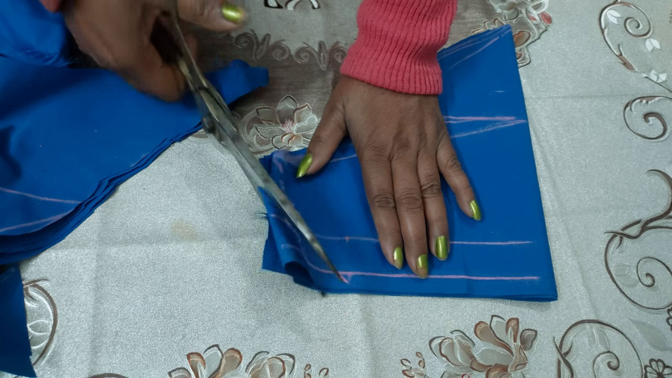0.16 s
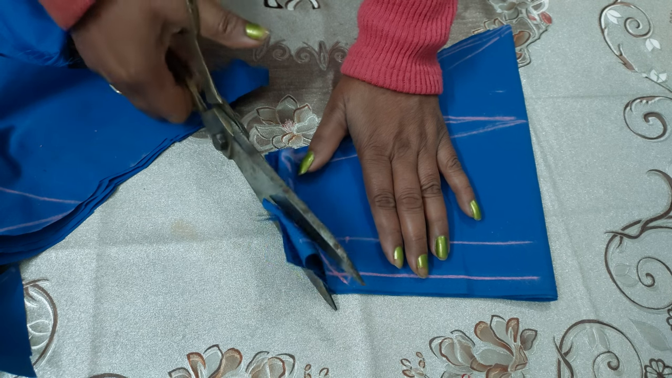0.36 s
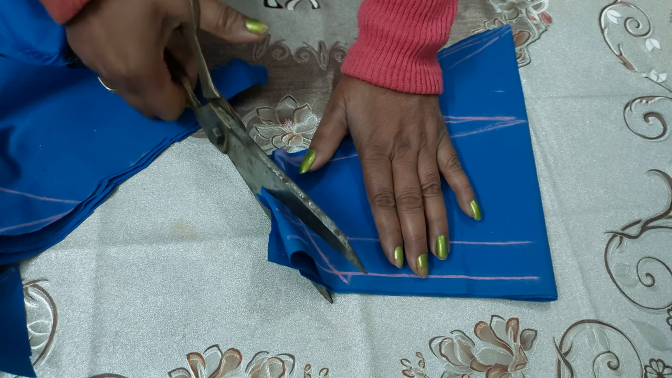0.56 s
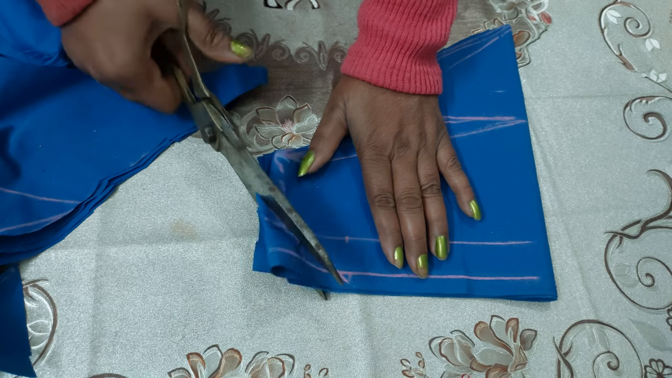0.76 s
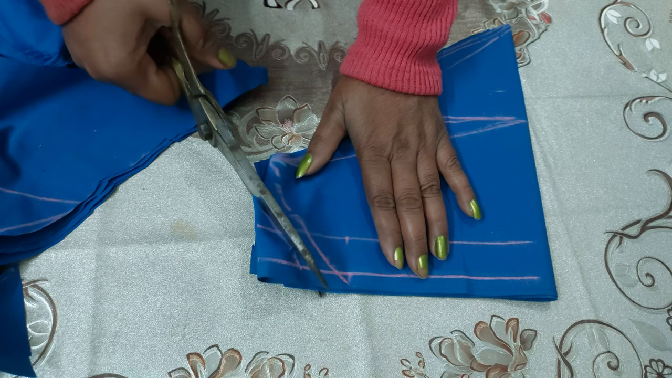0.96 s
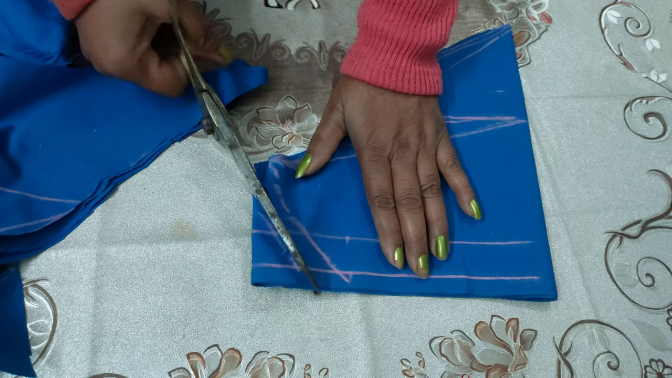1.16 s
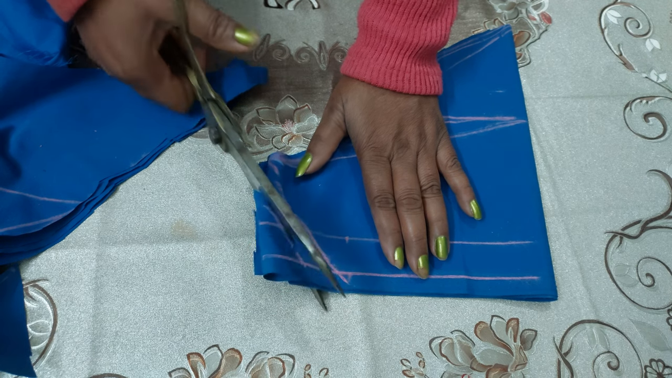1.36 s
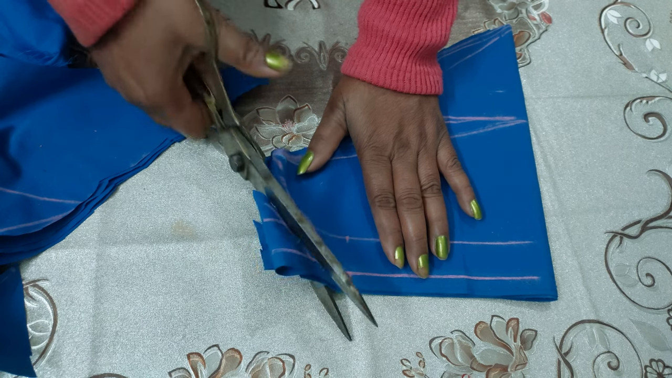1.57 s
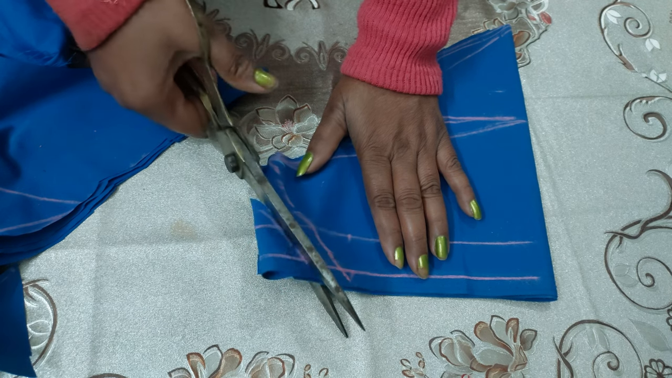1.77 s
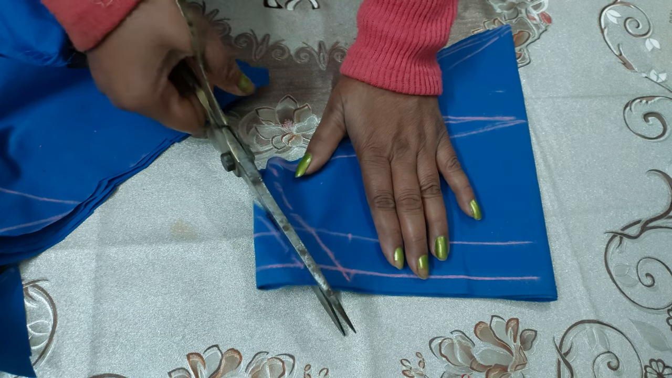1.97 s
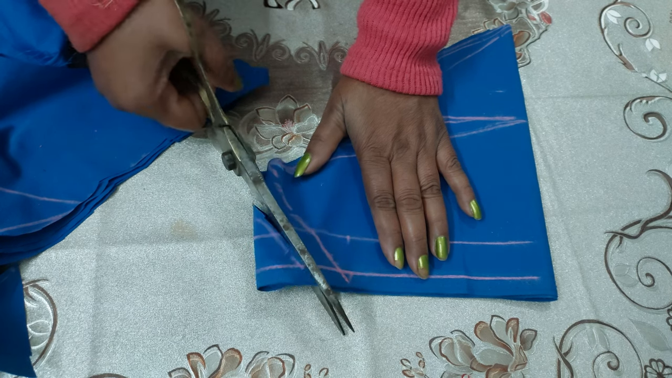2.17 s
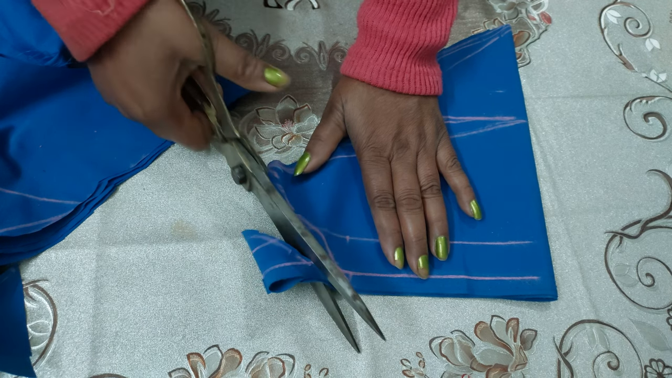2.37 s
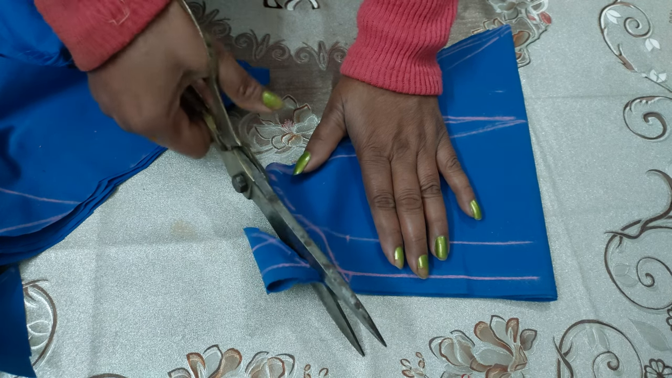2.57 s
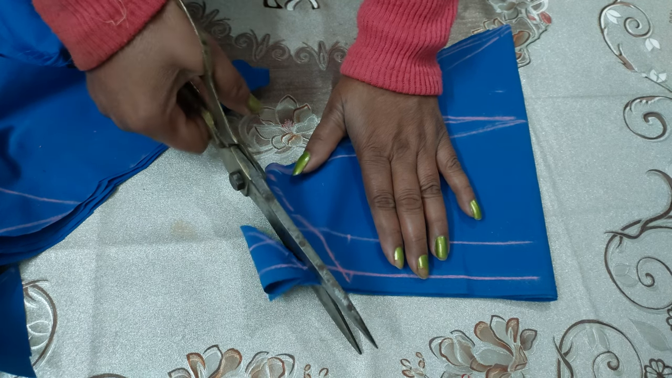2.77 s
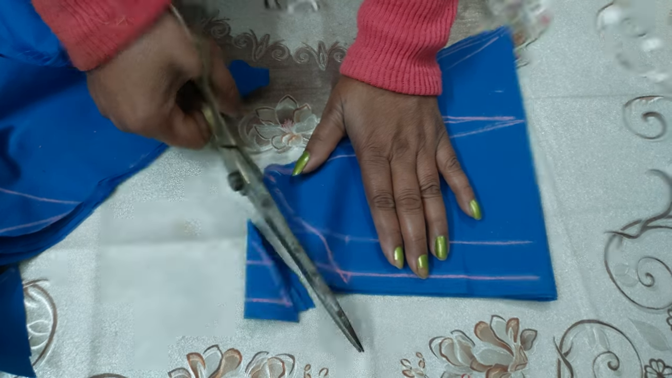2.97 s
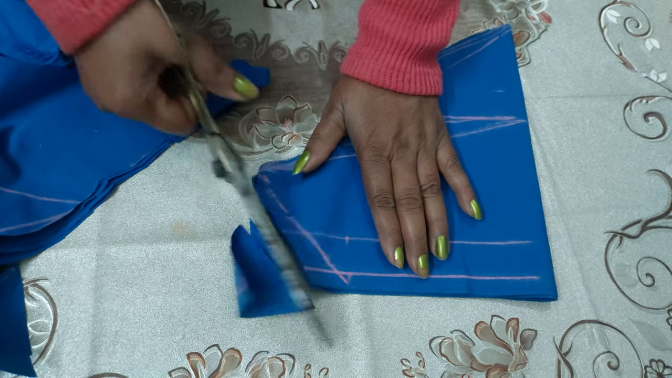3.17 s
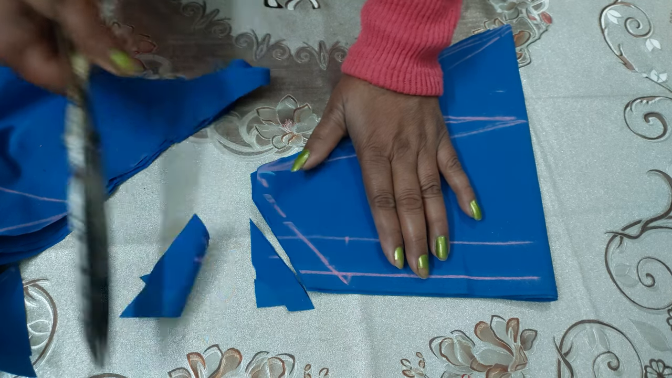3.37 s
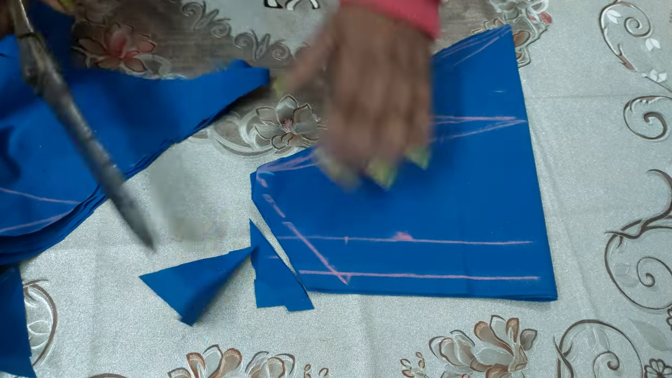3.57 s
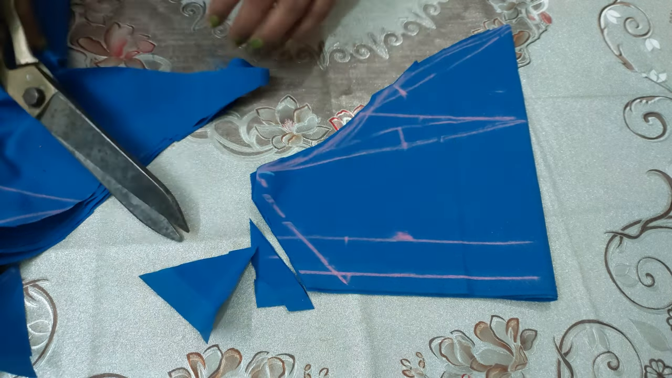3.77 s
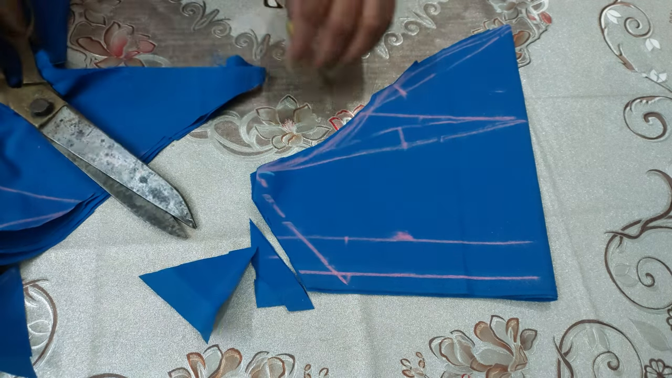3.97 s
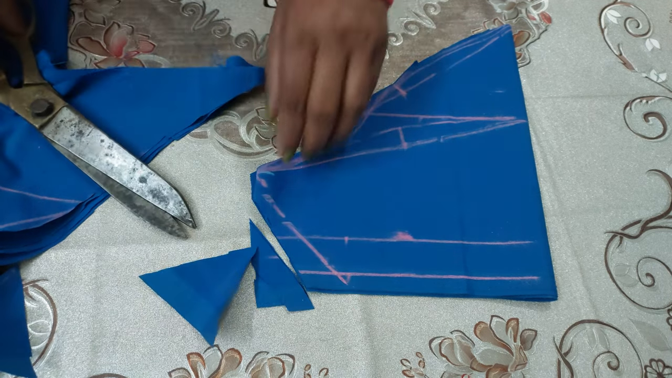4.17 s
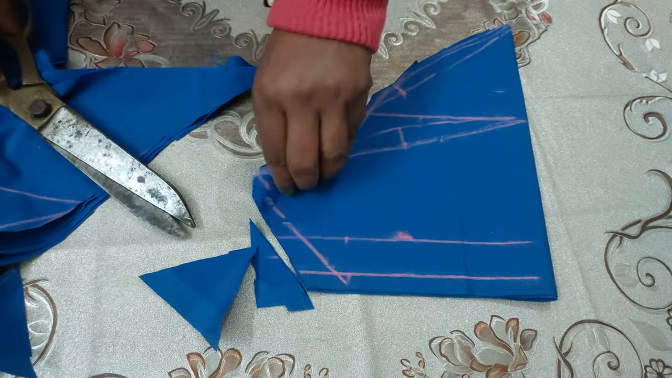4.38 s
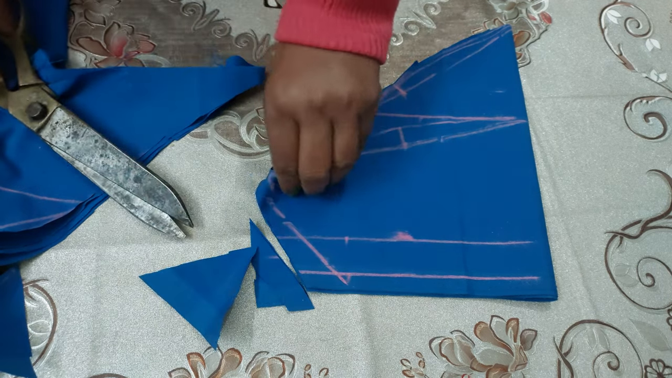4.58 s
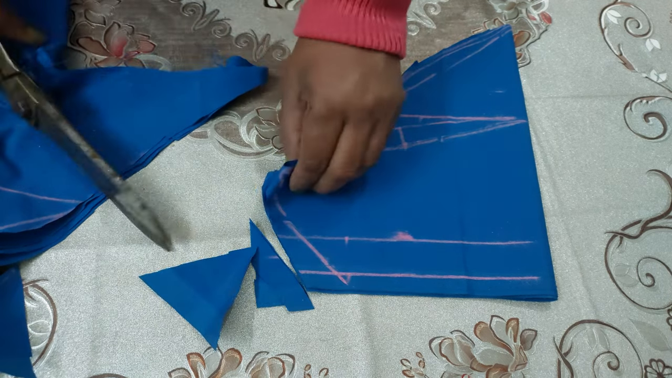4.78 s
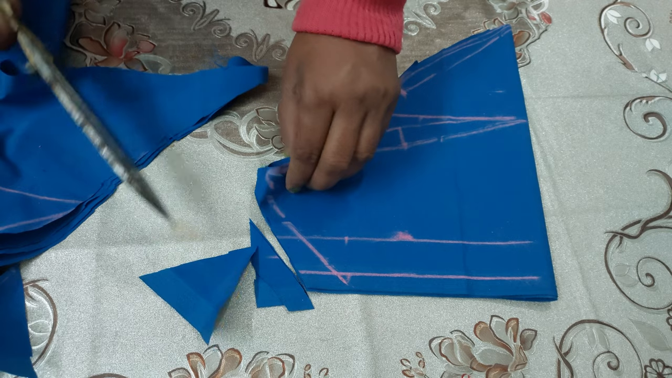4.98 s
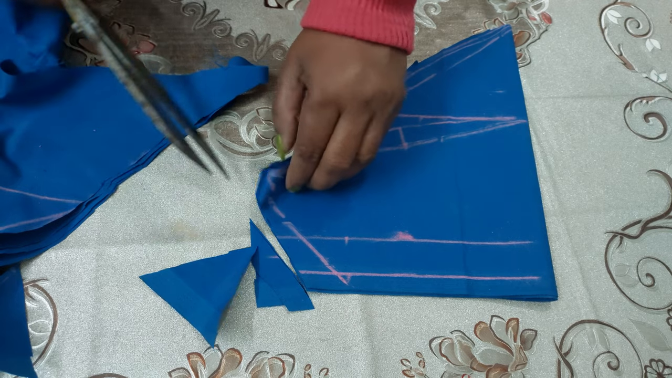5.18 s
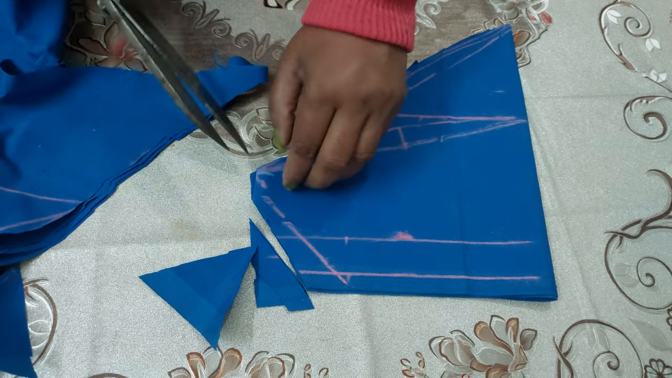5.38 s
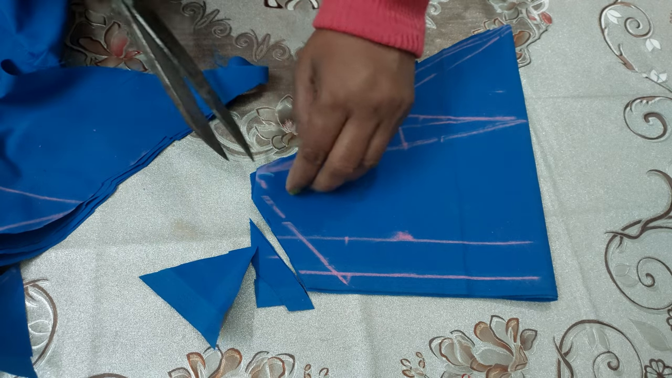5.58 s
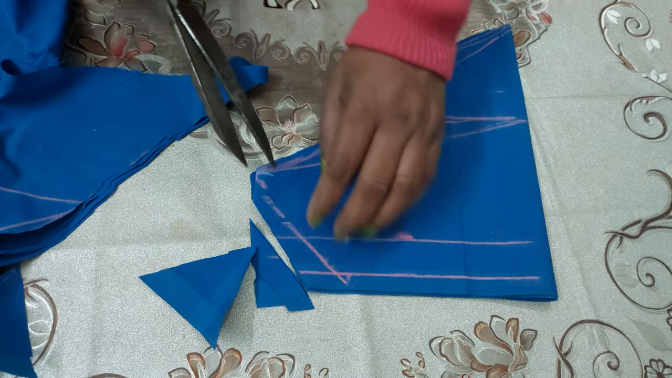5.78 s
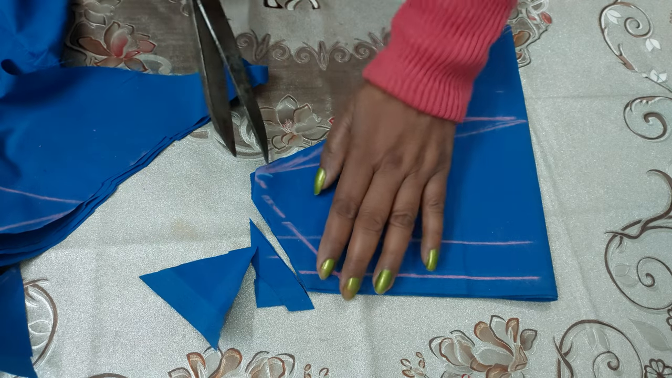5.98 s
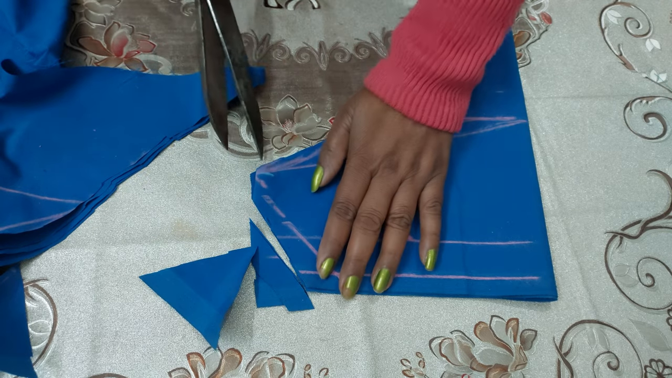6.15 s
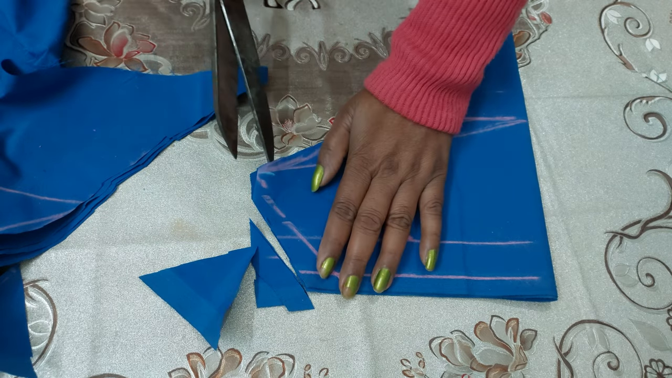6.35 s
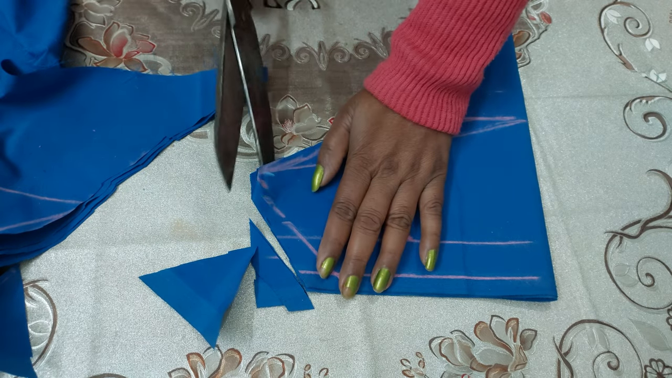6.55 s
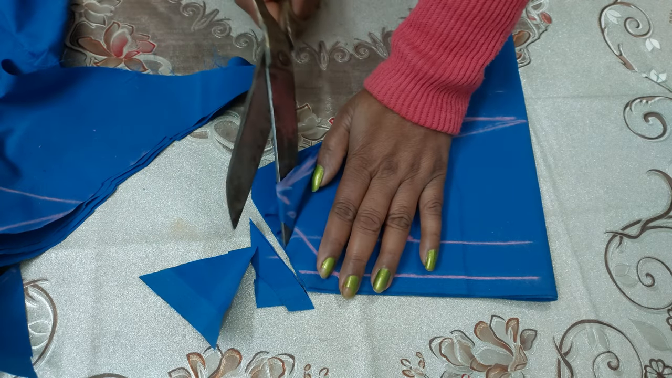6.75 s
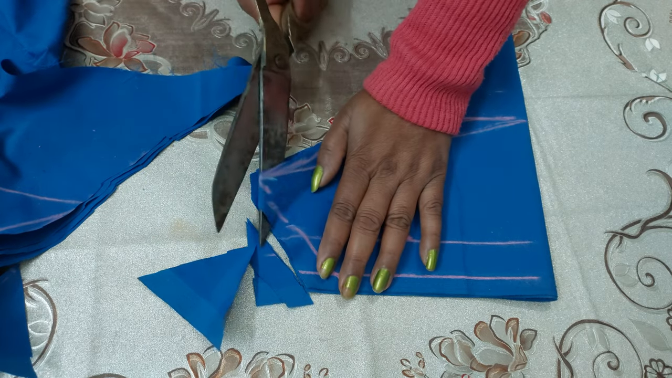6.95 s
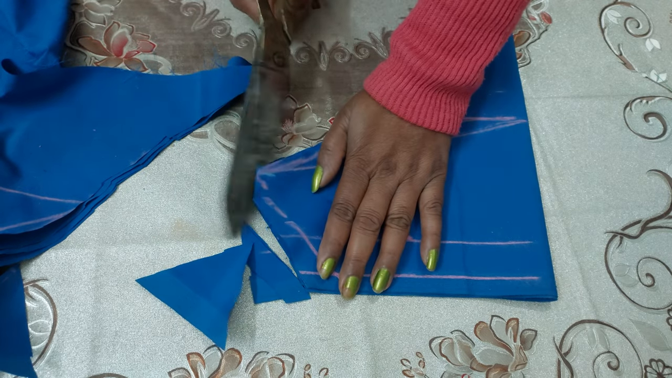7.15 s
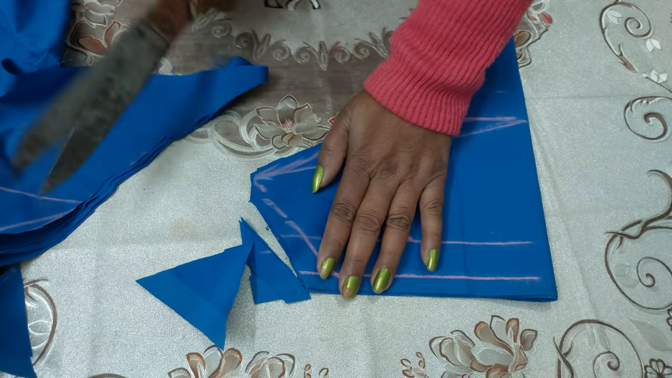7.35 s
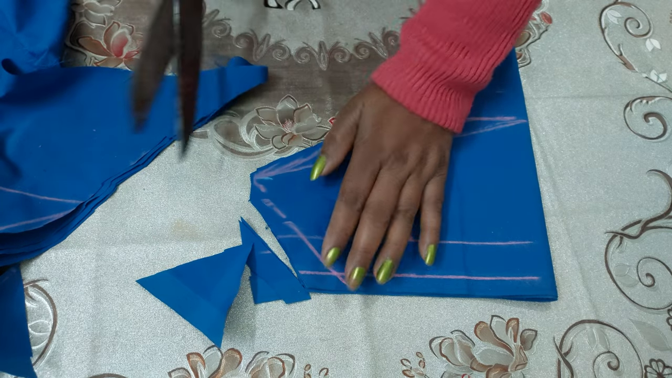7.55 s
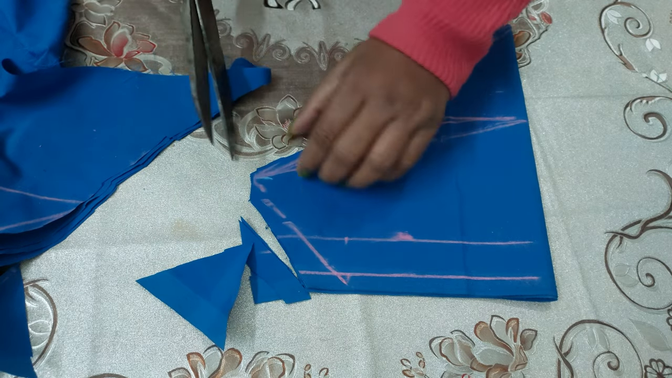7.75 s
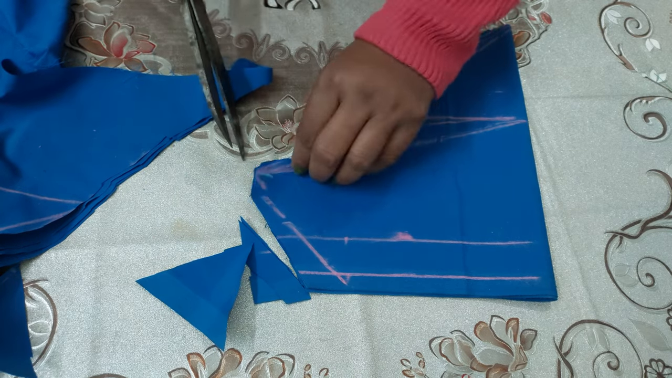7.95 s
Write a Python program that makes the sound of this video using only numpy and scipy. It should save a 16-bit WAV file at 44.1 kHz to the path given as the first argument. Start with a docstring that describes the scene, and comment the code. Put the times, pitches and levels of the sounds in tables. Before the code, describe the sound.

Close by in a small room, large shears crunch through fabric in uneven bursts, the cuts resonating in the wooden tabletop. The last cut finishes with a sharp metallic snap and a thump. Then come scattered knocks on the table, soft rustles of cloth and thin steel scrapes and squeaks as the empty blades move, all over a low, steady rush of room air.

```python
"""Tailor's shears cutting cloth

Heavy shears cut folded cloth on a wooden table in a small, hard room. Threads snap in runs;
the lower blade carries the crunch into the table top. The last cut ends as the blades clap shut.
Shears and hands bump the table, hands smooth the cloth, and a forearm drags with a rumble.
The bare blades scrape, grind and squeak at the pivot."""
import sys
import numpy as np
from scipy import signal
from scipy.fft import rfft, irfft, next_fast_len
from scipy.io import wavfile
from scipy.ndimage import map_coordinates

SR = 44100
rng = np.random.default_rng(int(sys.argv[2]) if len(sys.argv) > 2 else 0)


def materialize(psi):
    """Save the field psi as 16-bit PCM at rate SR to the path in sys.argv[1].

    A 1-D psi becomes a single channel; in a 2-D psi each row is a channel.
    """
    bounded = np.clip(np.atleast_2d(psi).T, -1, 1)
    quanta = np.round(bounded * 32767).astype(np.int16)
    wavfile.write(sys.argv[1], SR, quanta)


N = 353682

# Sweeps over the cloth. Each row: start and length in seconds, hiss in dB, sheen in dB re hiss.
CLOTH_STROKES = [(0.0,0.33,-64.5,-1.5), (0.798,0.34,-60.5,-9.5), (1.308,0.33,-61.5,-9),
                 (1.65,0.32,-67.5,-11), (2.234,0.55,-72,-7.5), (2.9,0.71,-73,-9), (3.546,0.3,-78,2),
                 (3.79,0.22,-68.5,-6), (4.205,0.34,-70,-14.5), (4.684,0.28,-68.5,-5), (5.562,0.76,-70.5,-6),
                 (5.78,0.17,-67,-13.5), (6.464,0.72,-67.5,-12), (6.603,0.32,-73,6.5), (7.33,0.29,-70,-7),
                 (7.825,0.24,-68,-20)]
# Blade actions. Each row: start in seconds, length in seconds, level in dB.
BLADE_PUSHES = [(0.0,0.34,-44), (0.406,0.41,-52.5), (0.648,0.13,-41), (0.768,0.47,-37.5),
                (1.295,0.41,-44.5), (1.59,0.5,-40.5), (2.237,0.12,-44), (2.45,0.43,-43.5), (4.302,0.18,-43)]
EDGE_GRINDS = [(0.033, 0.013, -53), (0.101, 0.024, -61), (1.379, 0.02, -48.5), (1.98, .03, -46.5),
               (2.257, 0.11, -63), (3.353, .005, -56), (3.745, 0.0052, -44.5), (7.172, 0.039, -51)]
THREAD_RUNS = [(0.102,0.023,-36), (0.864,0.041,-33), (0.888,0.11,-34.5), (0.994,0.013,-24.5),
               (1.012,0.078,-27.5), (1.058,0.02,-25), (1.099,0.018,-24), (1.117,0.042,-38),
               (1.311,0.027,-42), (1.836,0.05,-31.5), (1.986,0.019,-27), (2.016,0.0083,-26),
               (2.027,0.023,-26.5), (2.059,0.075,-36.5), (2.704,0.012,-31), (2.759,0.018,-30.5),
               (2.772,0.04,-35), (2.811,0.029,-29.5), (2.957,0.013,-22.5), (2.966,0.012,-17.5)]
# Bumps on the table. Each row: start in seconds, strength in dB, hardness in dB of clack re thud.
TABLE_KNOCKS = [(0.017,-1.5,-4.5), (0.045,3,-13.5), (0.154,9,-10.5), (1.065,-1,2), (1.328,4.5,-23),
                (1.426,5,-12.5), (1.851,8,-14), (1.994,10.5,-18), (2.029,5,-8), (2.13,0,-3),
                (2.515,7.5,-21), (2.711,6.5,-25), (2.97,14.5,-11.5), (2.982,23.5,-16), (3.748,13.5,-0.5),
                (4.299,11.5,-19), (4.787,-0.5,-27), (6.364,-6.5,-19.5), (6.538,3.5,-25), (7.097,-5,-25),
                (7.905,-8,-7), (7.948,-7,-3.5)]
# Steel on steel. Each row: start and length in seconds, level in dB, place from pivot 0 to tip 1.
EDGE_SCRAPES = [(0.108,0.025,-49.5,0.4), (0.675,0.0048,-59,0.7), (0.691,0.055,-55,0.7), (1.023,0.059,-49,1),
                (1.105,0.007,-41.5,0.044), (1.372,0.042,-55,0.17), (1.657,0.0083,-57.5,0.64),
                (1.677,0.03,-55,0.31), (2.107,0.024,-57.5,.75), (2.278,0.036,-62.5,0.5),
                (2.537,0.015,-65,.2), (2.577,0.009,-54.5,0.31), (2.828,0.0095,-51.5,.45),
                (4.298,0.0017,-54,0.22), (4.84,0.028,-60,0.82), (5.01,0.0071,-61,0.7),
                (5.095,0.025,-50.5,.5), (5.68,0.2,-69.5,0.58), (7.142,0.077,-49,0.99),
                (7.205,0.0099,-41.5,0.044), (7.391,0.008,-40.5,0.22), (7.395,0.02,-49.5,1),
                (7.468,0.022,-48,.5), (7.516,0.006,-60.5,0.97)]
# Dry pivot. Each row: start in seconds, length in seconds, pitch in Hz, level in dB.
PIVOT_SQUEAKS = [(0.704, 0.02, 492, -43.5), (0.707, 0.017, 656, -39.5), (5.673, 0.062, 6600, -74),
                 (5.684, 0.042, 10700, -65), (5.718, 0.064, 7700, -68), (5.796, 0.031, 10560, -56),
                 (5.808, 0.075, 7000, -66)]

# Wood and steel resonances. Each row: centre in Hz, width in Hz, weight in dB.
TABLE_MODES = [(87, 9.7, 3.5), (104, 23.7, -1.5), (156, 19, -10.5), (207, 46, -12.5), (288, 44.4, -5),
               (350, 88, -16), (585, 97, -19.5), (664, 110, -16.5), (1050, 194, -22.5), (1163, 73, -21),
               (1747, 73, -24.5)]
BENDING_MODES = [(2210, 450, 6), (3460, 1100, -2.5)]
PIVOT_MODES = [(3520, 770, -36.5), (5440, 720, 0.5), (6340, 430, -9.5)]
MIDBLADE_MODES = [(3440, 770, -15), (7480, 580, -2), (7700, 210, -14.5)]
TIP_MODES = [(9500, 1000, -3.5), (11240, 1600, 0.5), (12850, 190, 8), (14600, 420, 2)]
# Ring of the whole shears. Each row: frequency in Hz, relative level in dB, T60 in seconds.
SHEARS_MODES = [(162.5, 17.5, 0.38), (920, -11, 0.033), (1235, -8, 0.37), (1285, -1, 0.16),
                (2350, -17, 0.22)]

# Source spectra. Each row: frequency in Hz, relative density in dB.
AIR_SPECTRUM = [(15, -60.5), (25, -26), (86, -13), (178, -12), (204, -9), (227, -13.5), (260, -6),
                (340, -14), (631, -13.5), (703, -18), (945, -19), (1110, -18), (1710, -26), (3530, -46.5),
                (15500, -56.5)]
HISS_SPECTRUM = [(700, -13.5), (1500, 2.5), (2500, -5.5), (5000, -4), (7500, -1.5), (8400, -15),
                 (15000, -16)]
SHEEN_SPECTRUM = [(4000, -30), (8500, -4), (12000, 0), (15500, -1)]
RASP_SPECTRUM = [(900, -19), (2000, 2), (2600, -3.5), (3450, 5), (4400, -7.5), (5500, -2.5), (7600, -11.5),
                 (8500, -13.5), (10500, -8.5), (12500, -8.5), (15500, -15.5)]
CRACK_SPECTRUM = [(300, -3), (700, 10), (1250, 16), (2000, 7), (2800, 10), (4200, 16), (6500, 2), (8000, 4),
                  (10000, -2), (12000, 3), (14000, 6), (15500, 8)]
CLANG_SPECTRUM = [(1500, -10), (2600, -6), (3600, -1), (4600, 1), (5400, 1), (6300, -10), (9000, -15),
                  (13000, -10), (15500, -11)]

# Diffuse field. Each row: frequency in Hz, left-right correlation.
COHERENCE = [(60, 1), (250, 0.86), (600, 0.69), (1500, 0.03), (8000, 0.065)]
# Room decay. Each row: frequency in Hz, T60 in seconds.
ROOM_T60_S = [(80, 0.61), (250, 0.48), (1000, 0.56), (5000, 0.32), (9000, 0.35), (15000, 0.21)]
# Wall reflections. Each row: frequency in Hz, relative level in dB.
WALL_DB = [(90, 0), (250, 1), (600, 4), (2000, 2), (8000, 0.5)]


def amp(db):
    """Decibels to gain."""
    return 10 ** (np.asarray(db) / 20)


def unit(x):
    """Scale to rms 1."""
    return x / np.sqrt(np.mean(x ** 2) + 1e-20)


def along(points, hz):
    """Interpolate (Hz, value) points on a log axis."""
    knots_hz, values = np.transpose(points)
    return np.interp(np.log(hz + 1), np.log(knots_hz + 1), values)


def add(track, start_s, sound):
    """Mix a sound into the track."""
    part = track[max(round(start_s * SR), 0):][:len(sound)]
    part += sound[:len(part)]


def wobble(rate_hz, n):
    """Smooth random curve, n samples."""
    knots = rng.standard_normal(int(n * rate_hz / SR) + 4)
    return map_coordinates(knots, [np.arange(n) * rate_hz / SR])


def grid_hz():
    """Frequency grid for filter design."""
    return np.fft.rfftfreq(16384, 1 / SR) + 1


def resonances(modes):
    """Gain of modes summed in power."""
    f = grid_hz()
    powers = (amp(db) ** 2 / (1 + ((f * f - hz * hz) / (f * width_hz)) ** 2)
              for hz, width_hz, db in modes)
    return np.sqrt(sum(powers))


def response(gain):
    """Minimum-phase impulse response, energy 1."""
    cepstrum = irfft(np.log(np.maximum(gain / gain.max(), 1e-6)))
    half = len(cepstrum) // 2
    impulse = irfft(np.exp(rfft(2 * cepstrum[:half], 2 * half)))[:half]
    return impulse / np.linalg.norm(impulse)


def colour(points):
    """Impulse response for a (Hz, dB) spectrum."""
    return response(amp(along(points, grid_hz())))


def slips(length_s, per_s, clump_db, clump_hz, taper):
    """Clumped run of tiny random impulses, rms 1."""
    n = max(round(length_s * SR), 64)
    chance, size = rng.random(n), rng.standard_normal(n)
    threshold = max(per_s / SR, np.partition(chance, 4)[4])  # at least five impulses
    arch = np.sin(np.pi * (np.arange(n) + .5) / n) ** taper
    return unit(size * (chance <= threshold) * arch * amp(clump_db * wobble(clump_hz, n)))


def swell(length_s, peak_at=0.38, sharpness=0.64):
    """Hand speed over one stroke: rest, 1, rest."""
    progress = np.linspace(0, 1, int(length_s * SR))
    skewed = np.interp(progress, [0, peak_at, 1], [0, .5, 1])
    return np.abs(np.sin(np.pi * skewed)) ** sharpness


def diffuse(n):
    """Stereo noise, alike in the bass, unrelated in the treble."""
    angle = np.arccos(np.clip(along(COHERENCE, np.fft.rfftfreq(n, 1 / SR)), -1, 1)) / 2
    mid, side = irfft(rfft(rng.standard_normal((2, n))) * [np.cos(angle), np.sin(angle)], n)
    return np.array([mid + side, mid - side])


def table_gain(low_hz=68, high_hz=2100):
    """Table top; its cloth cover deadens the treble."""
    f = grid_hz()
    return resonances(TABLE_MODES) / np.sqrt(1 + (low_hz / f) ** 8) / np.sqrt(1 + (f / high_hz) ** 6)


def air(level_db=-50):
    """Low, steady rush of the room."""
    noise = diffuse(next_fast_len(N + SR // 2))
    rush = signal.fftconvolve(noise, colour(AIR_SPECTRUM)[None], "valid", axes=1)[:, :N]
    drift_db = .5 * wobble(3, N)
    return unit(rush) * amp(level_db + drift_db)


def cloth(rest_hiss_db=-82, rest_sheen_db=-85):
    """Fibres catch and let go under hands and blades; faster is louder."""
    hiss, sheen = np.full(N, amp(rest_hiss_db) ** 2), np.full(N, amp(rest_sheen_db) ** 2)
    for start_s, length_s, hiss_db, sheen_db in CLOTH_STROKES:
        add(hiss, start_s, (amp(hiss_db) * swell(length_s)) ** 2)
        add(sheen, start_s, (amp(hiss_db + sheen_db) * swell(length_s)) ** 2)
    out = np.zeros(N)
    for power, spectrum in ((hiss, HISS_SPECTRUM), (sheen, SHEEN_SPECTRUM)):
        fibres = slips(N / SR, per_s=14000, clump_db=2, clump_hz=45, taper=0)
        out += signal.fftconvolve(np.sqrt(power) * fibres, colour(spectrum))[:N]
    return out


def sliding():
    """Force on the table as the lower blade rides over the cover's weave."""
    speed = np.zeros(N)
    for start_s, length_s, db in BLADE_PUSHES:
        add(speed, start_s, amp(db) * swell(length_s))
    return speed * slips(N / SR, per_s=2000, clump_db=2.5, clump_hz=60, taper=0)


def knocks(base_rise_s=0.00076, body_share=0.42, rattle_db=-7, rattle_t60_s=0.23):
    """Soft bumps press slowly and wake low table modes, hard ones higher modes too; the frame rattles."""
    out, table = np.zeros(N), table_gain()
    t = np.arange(SR // 4) / SR
    highpass = signal.butter(2, 170, "high", fs=SR, output="sos")
    for start_s, db, clack_db in TABLE_KNOCKS:
        body_db = body_share * clack_db
        spectrum = [(110, 0.015), (200, body_db + 3), (330, body_db - .5),
                    (700, clack_db + 1.5), (1400, clack_db - 1.5), (2500, clack_db - 18)]
        struck = table * amp(along(spectrum, grid_hz()))
        strength = amp(db) * np.linalg.norm(struck) / np.linalg.norm(table)
        ring = response(struck)
        rise_s = base_rise_s * amp(-clack_db / 2)
        press = 1 - np.exp(-np.arange(len(ring)) / SR / rise_s)
        thud = strength * press * ring
        rattle = signal.sosfilt(highpass, rng.standard_normal(len(t))) * amp(-60 * t / rattle_t60_s)
        add(out, start_s, thud)
        add(out, start_s, amp(rattle_db) * signal.fftconvolve(thud, rattle / np.linalg.norm(rattle)))
    return out


def grinding():
    """Edges pressed hard judder and wake the blades' lower bending modes."""
    judder = np.zeros(N)
    for start_s, length_s, db in EDGE_GRINDS:
        add(judder, start_s, amp(db) * slips(length_s, per_s=2000, clump_db=5, clump_hz=267, taper=0.44))
    return signal.fftconvolve(judder, response(resonances(BENDING_MODES) ** 0.96))[:N]


def cutting(threads_per_s=1300, rasp_db=-19):
    """Snapping threads rasp at the edge and, with the sliding blade, shake the table."""
    snaps = np.zeros(N)
    for start_s, length_s, db in THREAD_RUNS:
        run = slips(length_s, threads_per_s, clump_db=5.5, clump_hz=170, taper=0.33)
        add(snaps, start_s, amp(db) * run)
    crunch = signal.fftconvolve(snaps + sliding(), response(table_gain()))[:N]
    rasp = amp(rasp_db) * signal.fftconvolve(snaps, colour(RASP_SPECTRUM))[:N]
    return crunch, rasp


def scraping(detune=0.017, friction_db=-11, fall_db_per_blade=23):
    """Edge rubs edge; the place of contact weights the modes, and each scrape is randomly detuned."""
    out, taps = np.zeros(N), np.arange(SR // 50)
    tilt = amp(along([(1500, -28), (3200, 16), (16000, -3)], grid_hz()))
    rings = np.array([response(tilt * resonances(modes) ** 1.25)
                      for modes in (PIVOT_MODES, MIDBLADE_MODES, TIP_MODES)])
    friction = colour([(1500, -7), (3500, -2.5), (8000, -0.5), (9500, -1), (15000, 1.5)])
    for start_s, length_s, db, place in EDGE_SCRAPES:
        shares = amp(-fall_db_per_blade * abs(place - np.linspace(0, 1, len(rings))))
        ring = shares / np.linalg.norm(shares) @ rings + amp(friction_db) * friction
        pitch_ratio = 1 + detune * rng.uniform(-1, 1)
        detuned = map_coordinates(ring[:2 * len(taps)], [taps * pitch_ratio])
        rub = slips(length_s, per_s=4000, clump_db=4, clump_hz=300, taper=.6)
        add(out, start_s, amp(db) * signal.fftconvolve(rub, detuned))
    return out


def squeaks(waver=0.032, waver_hz=1190):
    """Stick-slip at the dry pivot: thin, unsteady whistles."""
    out = np.zeros(N)
    for start_s, length_s, hz, db in PIVOT_SQUEAKS:
        n = int(length_s * SR)
        pitch_hz = hz * (1 + waver * wobble(waver_hz, n))
        phase = 2 * np.pi * np.cumsum(pitch_hz) / SR
        add(out, start_s, amp(db) * unit(np.hanning(n) * np.sin(phase)))
    return out


def clap(start_s=2.9795, crack_db=-6.5, crack_t60_s=.011, clang_db=-43, clang_t60_s=0.44, ring_db=-31):
    """Blades hit their stop: a crack, a dense clang and a short, hand-damped ring."""
    out, t = np.zeros(N), np.arange(SR // 2) / SR
    attack = 1 - np.exp(-t / .0005)
    for db, t60_s, spectrum in ((crack_db, crack_t60_s, CRACK_SPECTRUM),
                                (clang_db, clang_t60_s, CLANG_SPECTRUM)):
        burst = rng.standard_normal(len(t)) * amp(db - 60 * t / t60_s) * attack
        add(out, start_s, signal.fftconvolve(burst, colour(spectrum)))
    ring = sum(amp(db - 60 * t / t60_s) * np.sin(2 * np.pi * hz * t) for hz, db, t60_s in SHEARS_MODES)
    add(out, start_s, amp(ring_db) * ring)
    return out


def forearm(start_s=6.3, length_s=0.59, drag_db=-51):
    """A forearm settles and drags on the table: deep rumble."""
    drag = np.zeros(N)
    add(drag, start_s, amp(drag_db) * slips(length_s, per_s=490, clump_db=4, clump_hz=31, taper=0.67))
    rumble = colour([(15, -20), (35, 1.5), (75, -4.5), (130, -11), (400, -55), (1500, -100)])
    return signal.fftconvolve(drag, rumble)[:N]


def in_room(x, wet_db, left_db, left_lead_ms, hop=SR // 2):
    """Panned direct sound plus bare-wall tails; a fresh random tail is crossfaded in every half second."""
    hz, t, _ = signal.stft(np.zeros(hop), SR, nperseg=256)
    decay = amp(along(WALL_DB, hz)[:, None] - 60 * t / along(ROOM_T60_S, hz)[:, None])
    envelope = decay * (1 - np.exp(-t / 0.00079))
    wet = np.zeros((2, N))
    for centre in range(0, N, hop):
        noise_stft = signal.stft(diffuse(hop), nperseg=256)[2]
        tail = signal.istft(noise_stft * envelope, nperseg=256)[1]
        span = np.arange(max(centre - hop, 0), min(centre + hop, N))
        piece = x[span] * np.cos(np.pi / 2 * (span - centre) / hop)
        echoes = signal.fftconvolve(piece[None], tail / np.linalg.norm(tail[0]), axes=1)
        for channel, echo in zip(wet, echoes):
            add(channel, span[0] / SR, echo)
    n_fft, sides = next_fast_len(N + SR // 10), np.array([[.5], [-.5]])
    shift = np.exp(2j * np.pi * np.fft.rfftfreq(n_fft, 1 / SR) * sides * left_lead_ms / 1000)
    direct = amp(sides * left_db) * irfft(rfft(x, n_fft) * shift, n_fft)[:, :N]
    return direct + amp(wet_db) * wet


def scene():
    """Shears, table and cloth in the room."""
    crunch, rasp = cutting()
    blades = rasp + scraping() + grinding() + squeaks()
    steel = in_room(blades, wet_db=-3, left_db=2.5, left_lead_ms=0.139)
    stop = in_room(clap(), wet_db=-10, left_db=2.5, left_lead_ms=0.16)
    wood = in_room(crunch, wet_db=-3.5, left_db=-.5, left_lead_ms=0.14)
    bumps = in_room(knocks(), wet_db=-5, left_db=-0.2, left_lead_ms=0.15)
    fabric = in_room(cloth(), wet_db=4.5, left_db=-5.5, left_lead_ms=0.065)
    arm = forearm() * amp([[-6], [3]])  # mostly right
    return steel + wood + stop + bumps + fabric + arm + air()


def record(dry, low_hz=48, top_hz=15900):
    """Small microphone: bass roll-off, hard band limit."""
    n_fft = next_fast_len(N + SR // 2)
    f = np.fft.rfftfreq(n_fft, 1 / SR)
    highpass = 1j * f / (low_hz + 1j * f)
    return irfft(rfft(dry, n_fft) * highpass * (f < top_hz), n_fft)[:, :N]


dry = scene()
out = record(dry)
materialize(out)
```